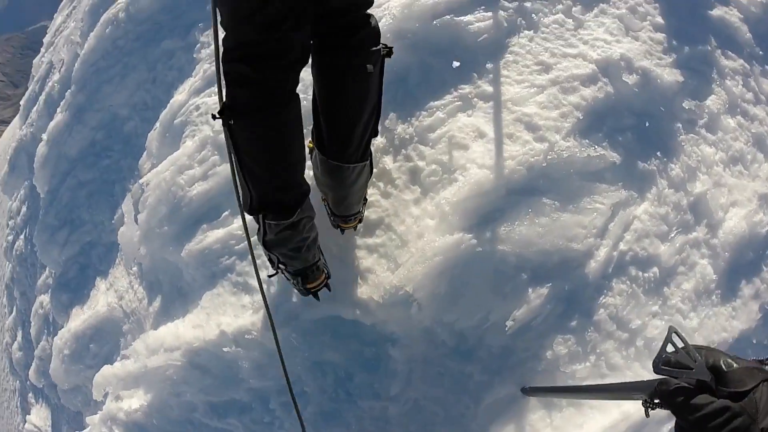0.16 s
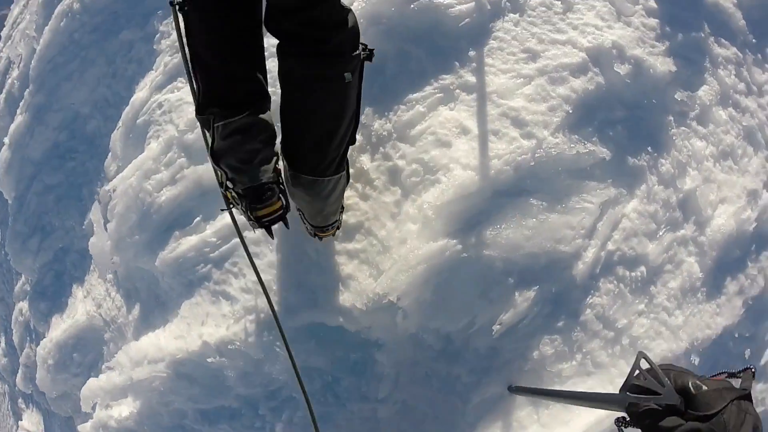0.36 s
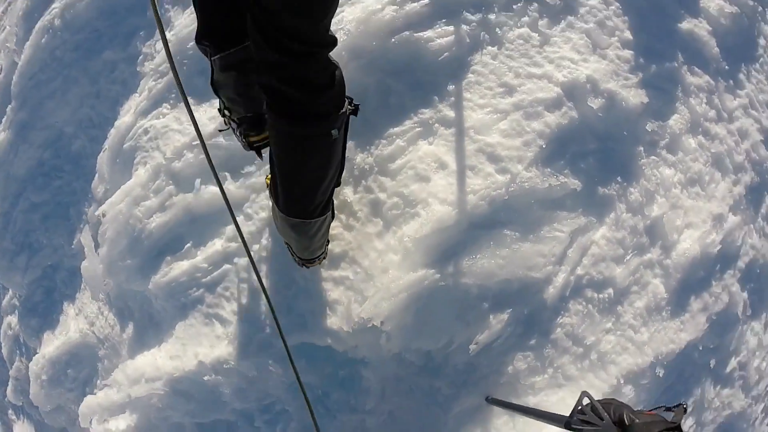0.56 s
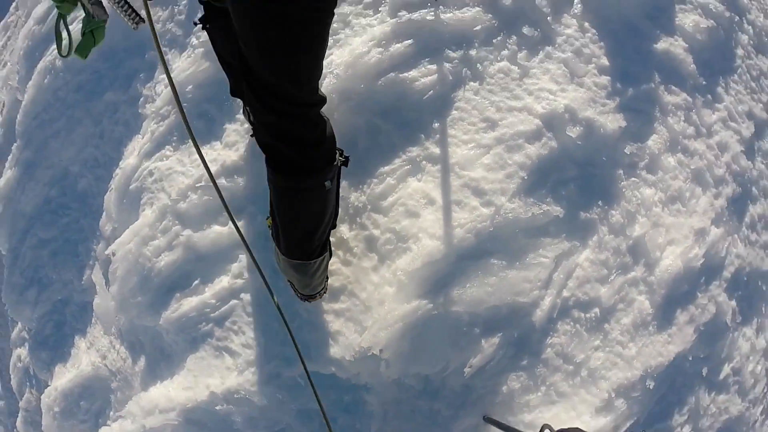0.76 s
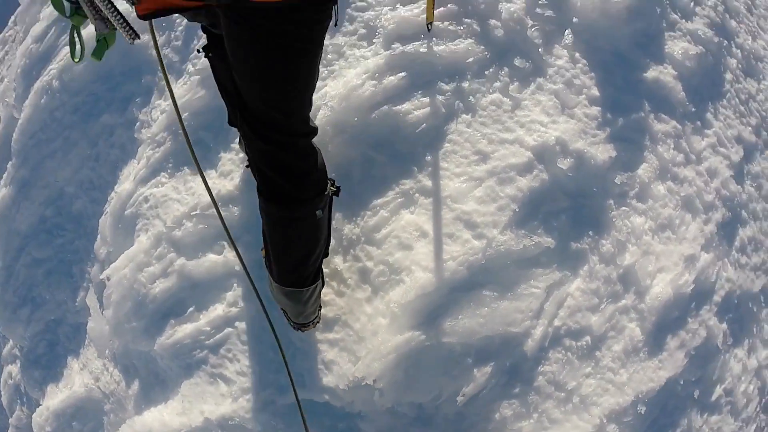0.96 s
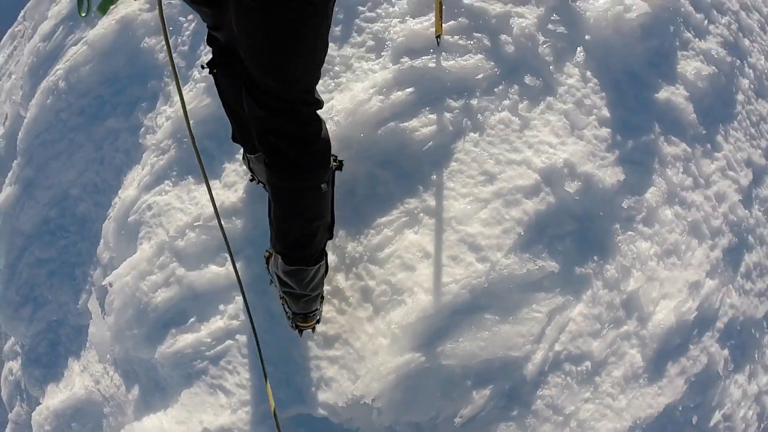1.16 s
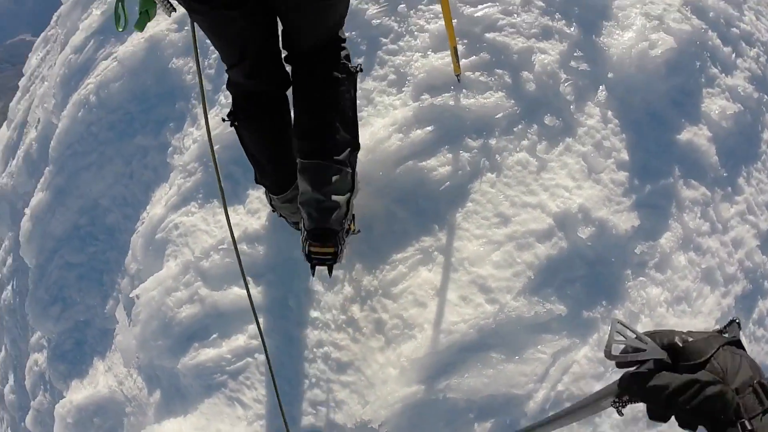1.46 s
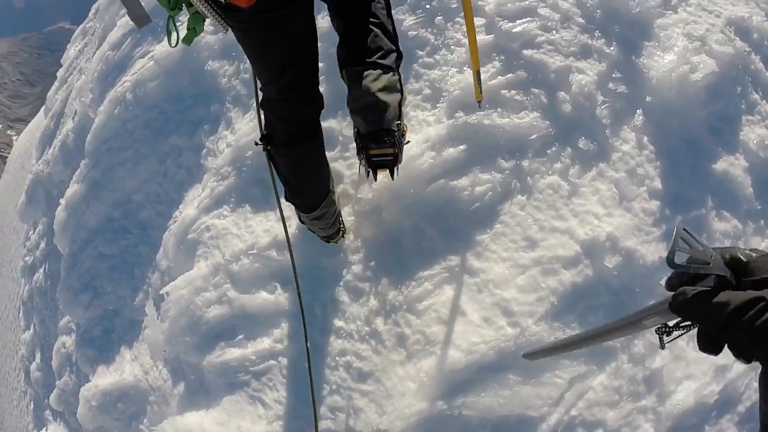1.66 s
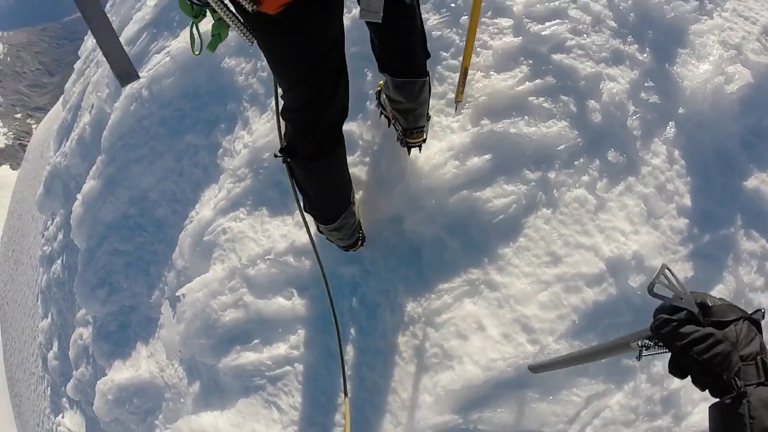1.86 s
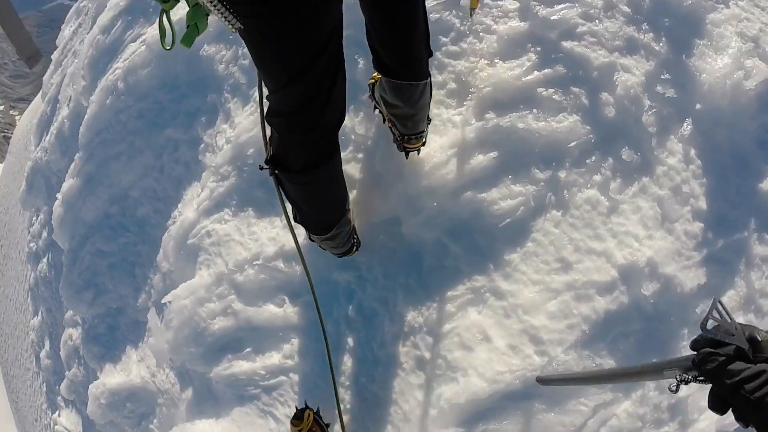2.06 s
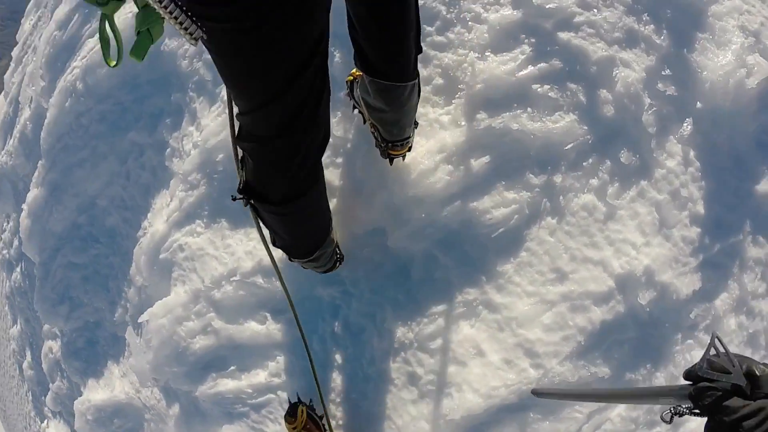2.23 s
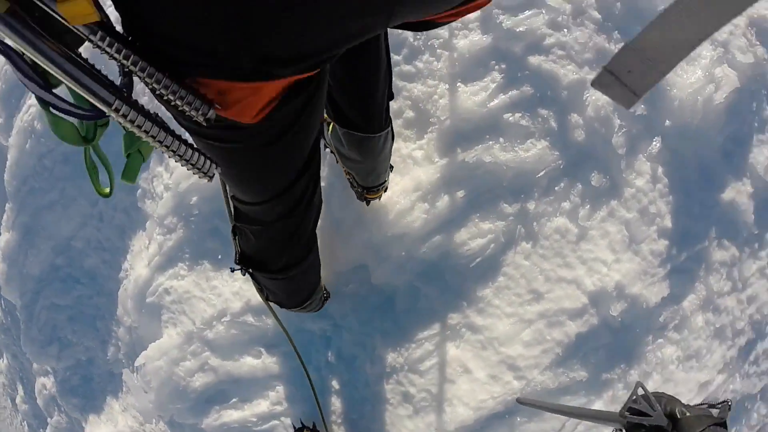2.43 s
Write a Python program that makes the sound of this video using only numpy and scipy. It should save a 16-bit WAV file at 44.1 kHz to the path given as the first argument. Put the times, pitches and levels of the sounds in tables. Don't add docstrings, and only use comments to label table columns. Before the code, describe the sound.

Crampon footsteps break dense snow crust with grainy crunches, sharp cracks and small scrapes. Deep uneven wind bumps hit the enclosed body-worn microphone outdoors, and hollow metal pieces knock together briefly late on, before the last steps.

```python
import sys
import numpy as np
from scipy import signal
from scipy.io import wavfile

SR = 44100
rng = np.random.default_rng(int(sys.argv[2]) if len(sys.argv) > 2 else 0)


def int16_out(signal):
    q = np.round(np.clip(np.atleast_2d(signal).T, -1, 1) * 32767)
    wavfile.write(sys.argv[1], SR, q.astype(np.int16))


def ratio(d):
    e = np.asarray(d, float) / 20
    return 10 ** e


N = 114660

# centre t/s, peak level/dB, f/Hz, length t/s
EDDY_THUMPS = [(0.069, -28.5, 53, 0.014), (0.16, -26.5, 51, 0.0095), (0.257, -11.5, 59.4, 0.028),
               (0.321, -14.5, 60, 0.035), (0.374, -5, 59, 0.015), (0.45, -12, 60, 0.039),
               (0.534, -22.5, 52, 0.016), (0.583, -32.5, 43, 0.08), (0.702, -19.5, 53.7, 0.012),
               (0.817, -31, 57, 0.039), (0.858, -18, 57, 0.014), (0.941, -10.5, 57, 0.034),
               (0.985, -19, 68.4, 0.021), (1.133, -12, 40, 0.021), (1.186, -22, 49, 0.017),
               (1.231, -30, 52.4, 0.039), (1.441, -19.5, 59, 0.023), (1.525, -26.5, 66, 0.024),
               (1.64, -24, 61, 0.021), (1.814, -21, 56, 0.018), (1.942, -31.5, 46.1, 0.066),
               (2.232, -17, 57, 0.014), (2.312, -21, 58, 0.028), (2.369, -22.5, 52.7, 0.011),
               (2.458, -29.5, 49.7, 0.022)]
# centre t/s, peak level/dB, f/Hz, length t/s
FURTHER_THUMPS = [(0.286, -21.5, 73, 0.012), (0.408, -14, 51.3, 0.028), (0.899, -15.5, 70.7, 0.043),
                  (0.665, -24, 40.4, 0.037), (0.732, -23, 49.4, 0.015), (0.031, -35, 70, 0.018),
                  (.2, -32, 61.4, 0.031), (1.349, -36.5, 60, 0.031), (1.598, -33, 50, 0.017),
                  (1.865, -33.5, 60.3, 0.03), (2.079, -39.5, 60, 0.017), (2.256, -22, 62, .015),
                  (2.531, -37, 59.5, 0.032)]
# f/Hz, level/dB per Hz
WIND_SPECTRUM = [(20, -2.5), (40, -1.5), (70, -11), (110, -17), (150, -21), (300, -27.5), (700, -36),
                 (1500, -39)]
# t/s, level/dB
GUSTINESS = [
    (0, -1.5),
    (.5, 4),
    (1.0, 2),
    (1.1, -0.5),
    (1.3, 2.5),
    (1.7, -0.5),
    (2.1, -1.5),
    (2.3, 1),
    (2.6, 1.5),
]
WIND_DB, WIND_PATCHY_DB, MEMBRANE_BEND = -42.5, 0.65, 0.25

# t/s, level/dB, f/Hz, t60/s
LINK_TICKS = [(.087, -53, 8900, .03), (0.605, -61, 8400, 0.098), (0.703, -54, 8460, 0.11),
              (.862, -50, 8350, 0.046), (0.878, -49, 8640, 0.036), (.879, -49.5, 11720, 0.038),
              (1.0, -65, 8500, 0.41), (1.285, -49, 8600, .03), (1.871, -50, 11640, .03),
              (1.965, -45.5, 11280, 0.044), (1.993, -48, 11400, .03), (2.402, -47, 6900, 0.043)]
# f/Hz, level/dB, t60/s
SCREW_MODES = [(1626, -5.5, .03), (2580, -14, 0.054), (3034, -3.5, 0.068), (3935, -1.5, 0.04),
               (4380, -12, 0.048), (4950, -13.5, 0.13), (5650, -12, 0.075), (6200, -15.5, 0.046),
               (7650, -22, .04), (8900, -17, 0.031), (10600, -24, 0.032)]
# t/s, level/dB
SCREW_KNOCKS = [
    (1.9253, -36.5),
    (1.943, -36.5),
    (1.964, -32.5),
    (1.994, -35.5),
    (2.057, -53.5),
    (2.101, -58),
    (2.125, -58),
    (1.975, -37.5),
]
# f/Hz, level/dB, t60/s
PICK_MODES = [(4980, 0.5, 0.11), (2930, 8, 0.033), (8600, -2, 0.025)]
# t/s, level/dB
PICK_KNOCKS = [
    (1.79, -41),
    (1.841, -58),
    (2.23, -44.5),
]
RATTLE_DB = 3.5

# start t/s, length t/s, level/dB, start f/Hz, end f/Hz
SPIKE_DRAGS = [(0.19, 0.18, -48, 1930, 1880), (1.16, .11, -47, 5600, 5800), (1.222, 0.21, -54, 1050, 1024),
               (1.23, 0.087, -50.5, 194.5, 200), (2.222, .09, -47, 1563, 1540),
               (2.27, 0.092, -42.5, 3000, 3720), (1.397, 0.078, -51.5, 3290, 3300),
               (.25, .17, -55, 1000, 800), (.49, .06, -52, 200, 190), (1.777, .03, -38, 2500, 3100),
               (1.882, .022, -40, 2700, 2700), (1.868, .013, -44, 2600, 2600), (2.13, .04, -54, 900, 1050),
               (.17, .05, -49, 3400, 2000), (.07, .085, -52, 1550, 1530), (1.66, .1, -59, 1850, 1800)]
DRAG_WIDTH = 0.055

# f/Hz, width f/Hz
CAVITY_MODES = [(1030, 68), (1560, 140), (1900, 30), (2620, 170), (3360, 247), (3990, 53), (4330, 110),
                (4900, 75), (5500, 240), (5980, 96), (6750, 320), (8300, 450), (10700, 270)]
CAVITY_LIFT_DB = 2.5

# full load t/s, rise t/s, fall t/s, level/dB, tilt/dB per octave
TREAD_LOADS = [(.005, 0.022, 0.12, -49.5, 2), (.13, 0.038, 0.28, -43.5, 2), (.3, 0.1, 0.39, -43.5, 0.5),
               (0.441, 0.27, 0.36, -40.5, -0.5), (0.901, 0.035, 0.29, -48.5, -0.4),
               (1.02, 0.011, 0.12, -45.5, -2), (1.099, 0.016, 0.13, -42, 0.5),
               (1.242, 0.17, 0.044, -42, 0.5), (1.28, 0.063, 0.1, -47, -5.5),
               (1.45, 0.089, 0.12, -46, -2.5), (1.7, 0.43, 0.029, -58.5, -9.5),
               (1.96, 0.15, 0.027, -50.5, 0), (2.139, 0.066, 0.078, -47.5, -4),
               (2.23, 0.049, 0.15, -39.5, -1.2), (2.33, 0.13, 0.039, -42.5, -0.5),
               (2.448, 0.13, 0.061, -45, 0), (2.55, 0.078, 0.17, -40.5, -1.3),
               (1.899, 0.022, 0.047, -48, -5), (1.82, 0.026, 0.04, -50, -5.5),
               (.82, 0.043, 0.045, -42.5, 1), (.772, 0.031, 0.038, -37.5, -2.5),
               (1.79, 0.017, 0.025, -34.5, -1.2), (1.894, 0.014, 0.017, -33, 0)]
# t/s, fall t/s, level/dB, tilt/dB per octave
SPIKE_BITES = [(0.077, 0.015, -41, -0.5), (0.11, 0.027, -48.5, 7), (0.1701, 0.013, -35, 1.5),
               (0.2, .012, -36, 0.5), (0.6517, 0.0084, -40.5, -0.5), (0.666, 0.034, -44, 1.5),
               (0.6864, 0.012, -38.5, -0.5), (0.712, 0.012, -41, -0.5), (0.751, 0.013, -54, 8),
               (0.866, 0.013, -41, 1), (1.008, 0.018, -40.5, -1), (1.087, 0.021, -37, -1),
               (1.218, .012, -56, -2), (1.359, 0.013, -45.5, -2), (1.409, 0.025, -49.5, 3),
               (1.557, 0.13, -43.5, -2), (1.776, .008, -39, 2.5), (1.783, .01, -35, 3.5),
               (1.871, 0.01, -44, 1), (1.966, 0.029, -44, 5), (1.991, 0.01, -40, 1),
               (2.099, 0.043, -52.5, 5.5), (2.403, 0.013, -32, 0), (2.529, .015, -45.5, 5.5),
               (2.195, 0.012, -53.5, 9.5), (.39, 0.0078, -34, -0.5), (0.461, 0.011, -41, 2.5)]
# t/s, peak level/dB
CRUST_CRACKS = [(0.087, -29), (0.15, -26), (0.2344, -29), (0.253, -22.5), (0.2778, -27), (0.3294, -31),
                (0.3497, -21.5), (0.3694, -26), (0.4186, -27), (0.5514, -38), (0.5931, -46), (0.627, -34.5),
                (0.7758, -30), (0.8812, -27.5), (0.895, -31), (0.911, -28), (0.9265, -28.5), (0.9444, -33),
                (0.9563, -31), (1.0394, -41), (1.0544, -29.5), (1.1772, -23), (1.239, -38), (1.4744, -37),
                (1.5823, -30), (1.6387, -38), (1.6831, -51), (1.788, -18), (1.89, -24), (1.911, -30),
                (2.169, -33), (2.2092, -20.5), (2.257, -22.5), (2.333, -27), (2.4386, -31), (2.4594, -36)]
# f/Hz, level/dB per Hz
SNOW_SPECTRUM = [(150, -39), (250, -9.5), (488, -9.5), (1040, -5.5), (1190, -11), (1890, -3), (3270, -4),
                 (15000, -27.5)]
BITE_RISE_S = 0.0017
CRACK_FALL_S, CRACK_LOSS_DB, CRACK_TILT = 0.0077, 12, 0.13
THIN_DB, THIN_HZ = 5, 1740
RISE_CURVE, FALL_CURVE = 0.6, 1.33
GRAINS_PER_S, GRAIN_SPREAD_DB = 7000, 3.0
CLUMP_DB, CLUMPS_PER_S, SNOW_PATCHY_DB = 1.19, 77, 1.0
CREEP_DB, CREEP_TILT = -56, -0.61


def at_hz(points, hz):
    table_hz, table_db = np.transpose(points)
    return np.interp(np.log(hz), np.log(table_hz), table_db)


def rms_one(x):
    return x / np.sqrt(np.mean(x ** 2) + 1e-20)


def drift(rate_hz):
    pole = np.exp(-80 * np.pi * rate_hz / SR)
    noise = rng.standard_normal(N // 40 + 2002)
    slow = signal.lfilter([1], [1, -2 * pole, pole * pole], noise)[2000:]
    return np.interp(np.arange(N) / 40, np.arange(len(slow)), rms_one(slow))


def band(x, low_hz, high_hz):
    return signal.sosfilt(signal.butter(2, [low_hz, high_hz], "band", fs=SR, output="sos"), x)


def ring(s, db, hz, t60):
    clicks = np.full(N, 1e-18)
    clicks[(np.asarray(s) * SR).astype(int)] = ratio(db)
    r = ratio(-60 / (t60 * SR))
    w = 2 * np.pi * hz / SR
    return signal.lfilter([0, np.sin(w)], [1, -2 * r * np.cos(w), r * r], clicks)


def wind():
    t = np.arange(N) / SR
    together = drift(8.8)
    gust_db = np.interp(t, *np.transpose(GUSTINESS))
    white = rng.standard_normal((2, N + SR))
    edges = 18 * 2 ** np.arange(0, 7, .5)
    flutter = 0
    for k, (low, high) in enumerate(zip(edges, edges[1:])):
        level_db = at_hz(WIND_SPECTRUM, np.sqrt(low * high))
        level_db = level_db + WIND_PATCHY_DB * (together + drift(8)) + gust_db * (low > 70)
        flutter = flutter + ratio(level_db) * band(white[k % 2], low, high)[SR:]
    out = ratio(WIND_DB) * rms_one(flutter)
    eddies = list(EDDY_THUMPS) + list(FURTHER_THUMPS)
    for (s, db, hz, length), turn in zip(eddies, rng.random(60)):
        swell = np.exp(-2 * ((t - s) / length) ** 2)
        out = out + ratio(db) * swell * np.cos(2 * np.pi * (hz * (t - s) + turn))
    return out + MEMBRANE_BEND * band(out ** 2, 83, 210)


def gear():
    out = sum(ring([s], db, hz, t60) for s, db, hz, t60 in LINK_TICKS)
    for modes, knocks in ((SCREW_MODES, SCREW_KNOCKS), (PICK_MODES, PICK_KNOCKS)):
        s, db = np.transpose(knocks)
        for hz, mode_db, t60 in modes:
            strike_db = db + mode_db + 2.5 * rng.standard_normal(len(s))
            out = out + ring(s, strike_db, hz, t60) * ratio(RATTLE_DB * drift(67))
    return band(out, 1070, 19000)


def drags():
    out = np.zeros(N)
    white = rng.standard_normal((2, N))
    for s, length, db, start_hz, end_hz in SPIKE_DRAGS:
        start = int(s * SR)
        u = np.linspace(0, 1, int(length * SR))
        end = start + len(u)
        low_pass = signal.butter(2, DRAG_WIDTH * start_hz, fs=SR, output="sos")
        slow = signal.sosfilt(low_pass, white)[:, start:end]
        phase = np.cumsum(2 * np.pi * (start_hz + (end_hz - start_hz) * u) / SR)
        rasp = rms_one(slow[0] * np.cos(phase) + slow[1] * np.sin(phase))
        out[start:end] += ratio(db) * np.sin(np.pi * u) ** .5 * rasp
    return out * ratio(CLUMP_DB * drift(CLUMPS_PER_S))


def housing(x):
    for hz, width_hz in CAVITY_MODES:
        r = np.exp(-np.pi * width_hz / SR)
        poles = [1, -2 * r * np.cos(2 * np.pi * hz / SR), r * r]
        x = x + ratio(CAVITY_LIFT_DB) * signal.lfilter([(1 - r * r) / 2, 0, (r * r - 1) / 2], poles, x)
    return ratio(-4.0) * x


def snow_grains():
    breaks = rng.random((2, N)) < GRAINS_PER_S / SR
    clump = ratio(CLUMP_DB * drift(CLUMPS_PER_S))
    size_db = GRAIN_SPREAD_DB * np.minimum(rng.exponential(1, (2, N)), 5)
    sizes = ratio(size_db) * rng.choice([-1, 1], (2, N))
    return sizes * breaks * clump


def snow():
    bites = [(s, BITE_RISE_S, *rest) for s, *rest in SPIKE_BITES]
    cracks = [(s + BITE_RISE_S, BITE_RISE_S, CRACK_FALL_S, db - CRACK_LOSS_DB, CRACK_TILT)
              for s, db in CRUST_CRACKS]
    s, rise, fall, db, tilt = np.transpose(list(TREAD_LOADS) + bites + cracks)[:, :, None]
    t = np.arange(0, N + 16, 16) / SR
    loading = np.clip(1 - (s - t) / rise, 0, 1) ** RISE_CURVE
    unloading = np.clip(1 - (t - s) / fall, 0, 1) ** FALL_CURVE
    load = np.where(t < s, loading, unloading)
    grains = snow_grains()
    edges = 250 * 2 ** np.arange(0, 6.3, 1 / 3)
    scale = np.sqrt(sum(ratio(2 * at_hz(SNOW_SPECTRUM, e)) * e * .23 for e in edges if 1200 < e < 8000))
    out = 0
    for k, (low, high) in enumerate(zip(edges, edges[1:])):
        hz = np.sqrt(low * high)
        octaves = np.log2(hz / 3000)
        thin_db = THIN_DB * (fall < .04) * min(0, np.log2(hz / THIN_HZ))
        power = np.sum((load * ratio(db + tilt * octaves + thin_db)) ** 2, axis=0)
        power = power + ratio(CREEP_DB + CREEP_TILT * octaves) ** 2
        gain = np.interp(np.arange(N) / SR, t, np.sqrt(power))
        gain = gain * ratio(at_hz(SNOW_SPECTRUM, hz) + SNOW_PATCHY_DB * drift(18.5))
        out = out + gain * np.sqrt(high - low) / scale * rms_one(band(grains[k % 2], low, high))
    return out


def scene():
    return (wind() + housing(snow()) + drags() + gear())[None]


def top_cut(x):
    return signal.sosfilt(signal.butter(12, 15260, fs=SR, output="sos"), x)


def record(dry):
    return top_cut(dry)


dry = scene()
out = record(dry)
int16_out(out)
```